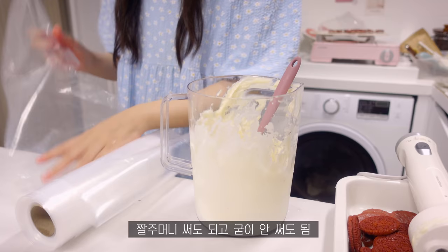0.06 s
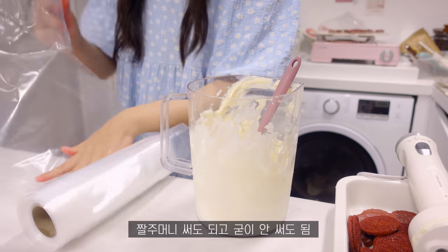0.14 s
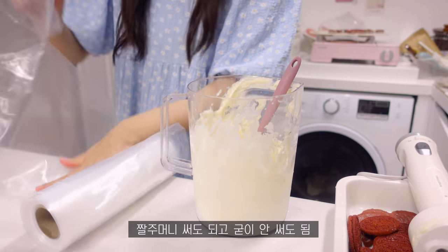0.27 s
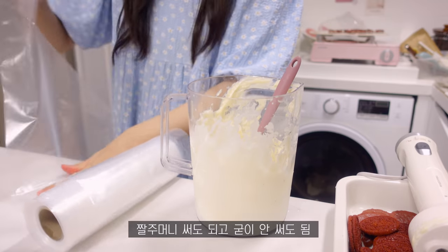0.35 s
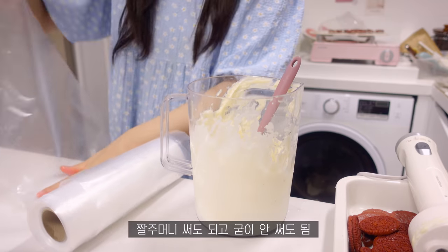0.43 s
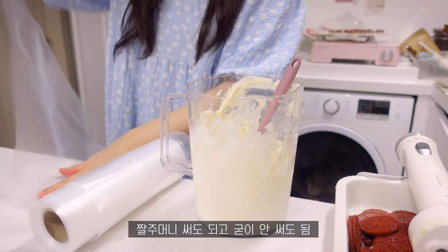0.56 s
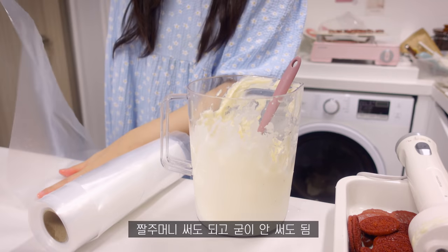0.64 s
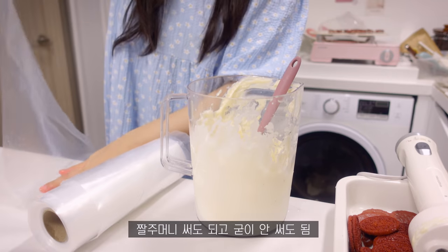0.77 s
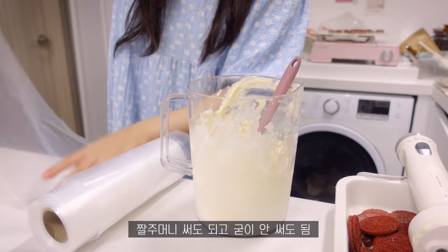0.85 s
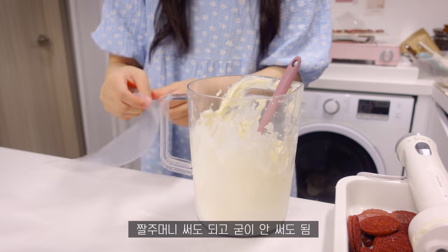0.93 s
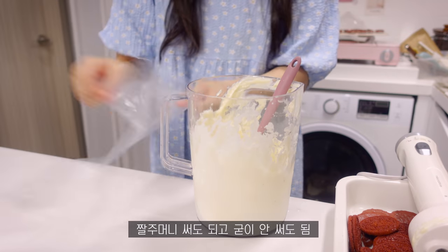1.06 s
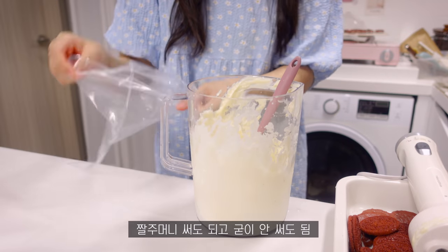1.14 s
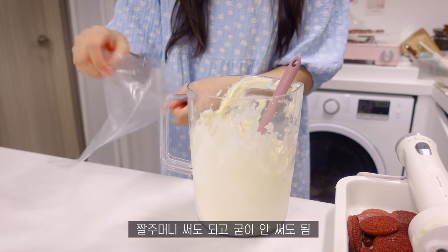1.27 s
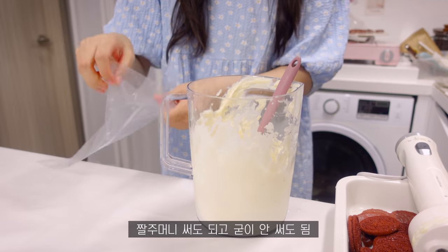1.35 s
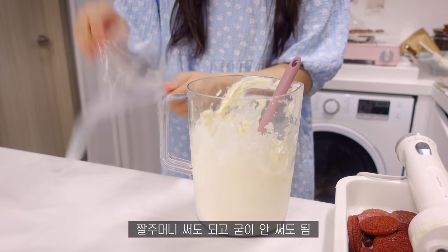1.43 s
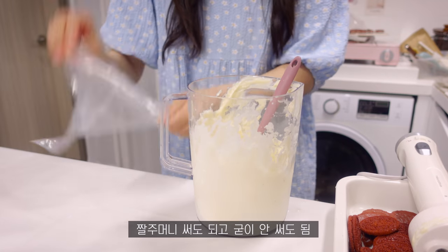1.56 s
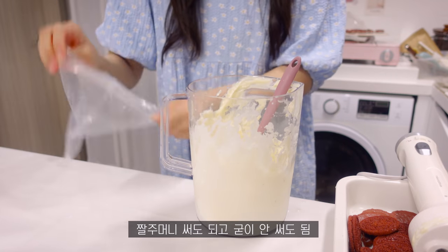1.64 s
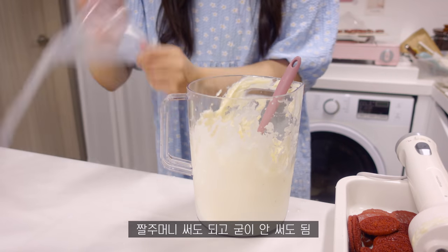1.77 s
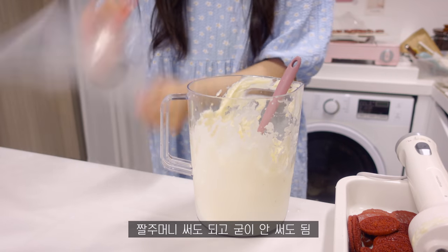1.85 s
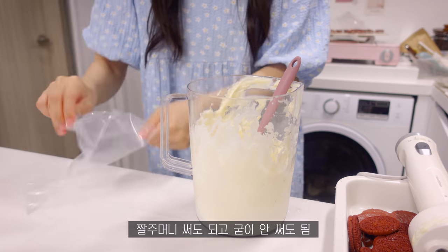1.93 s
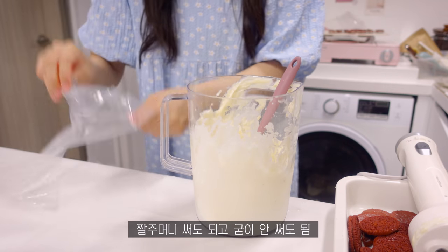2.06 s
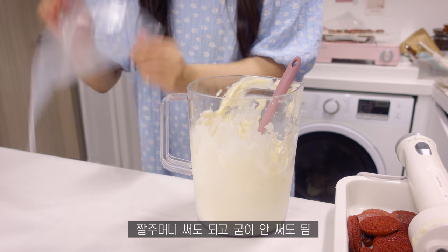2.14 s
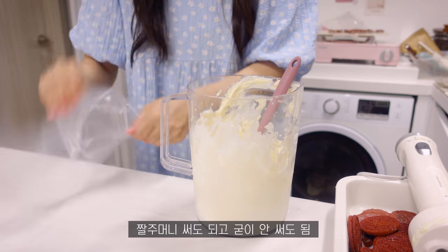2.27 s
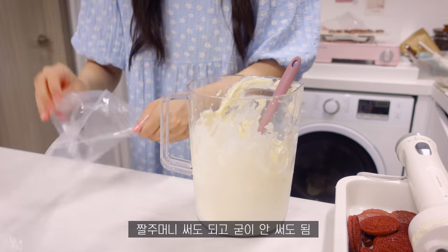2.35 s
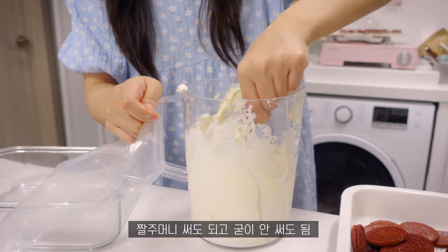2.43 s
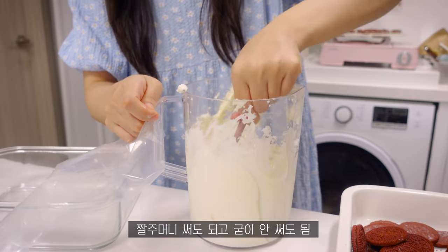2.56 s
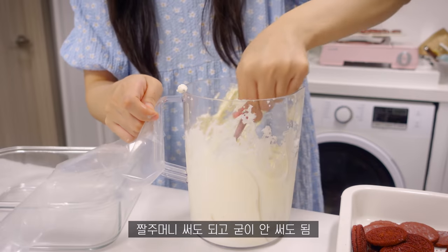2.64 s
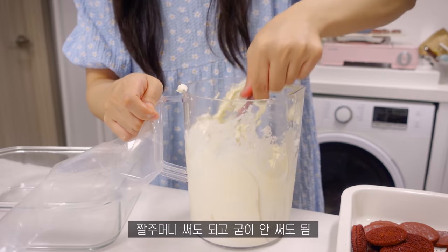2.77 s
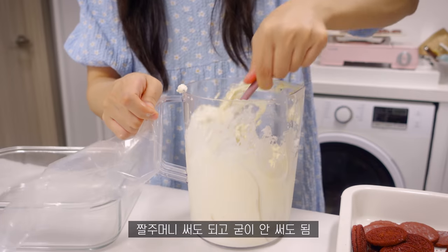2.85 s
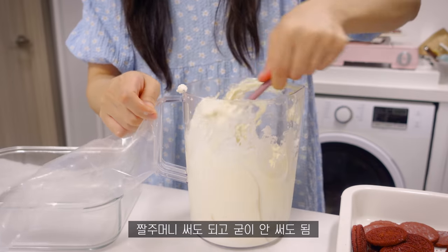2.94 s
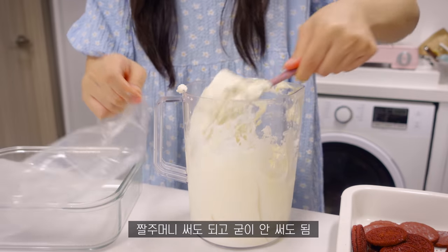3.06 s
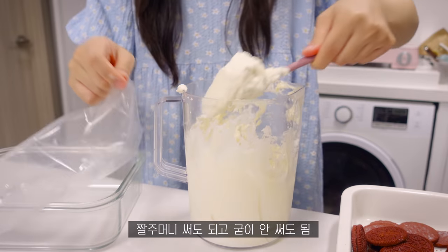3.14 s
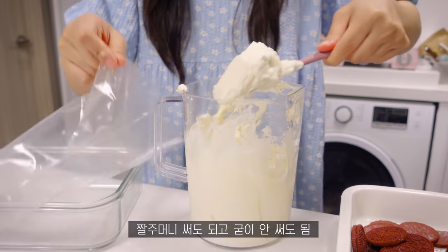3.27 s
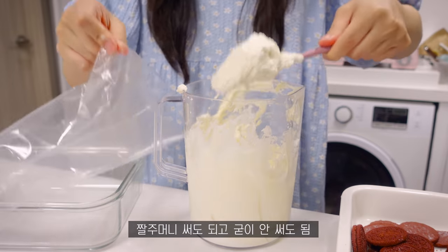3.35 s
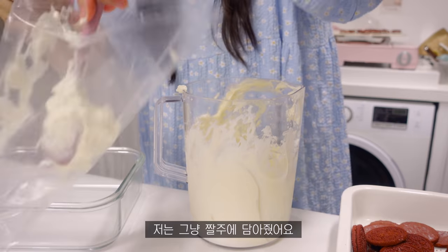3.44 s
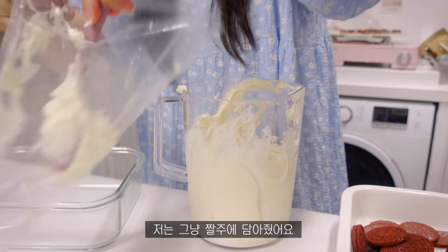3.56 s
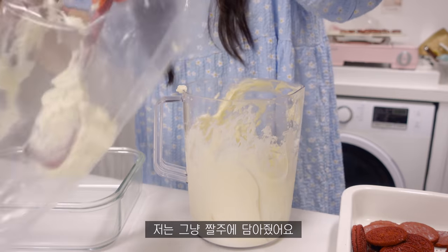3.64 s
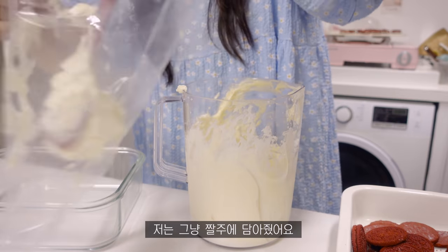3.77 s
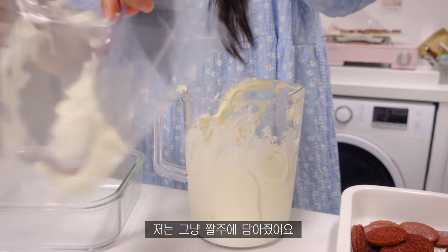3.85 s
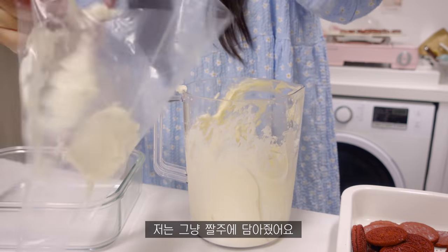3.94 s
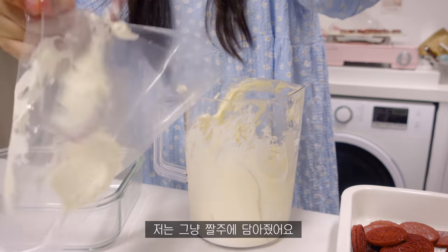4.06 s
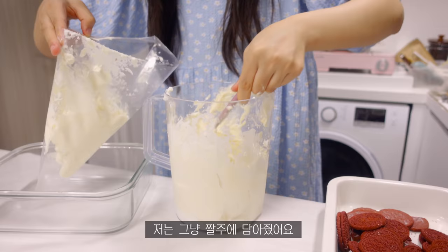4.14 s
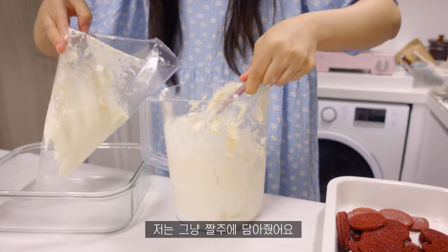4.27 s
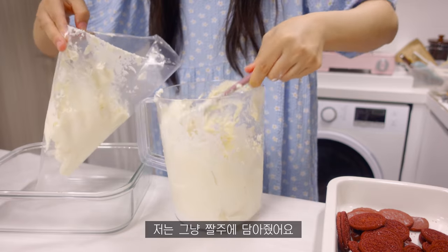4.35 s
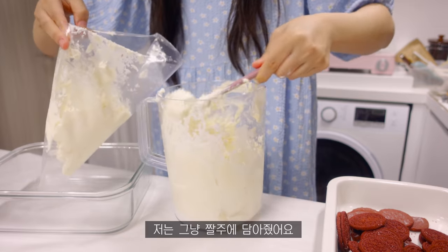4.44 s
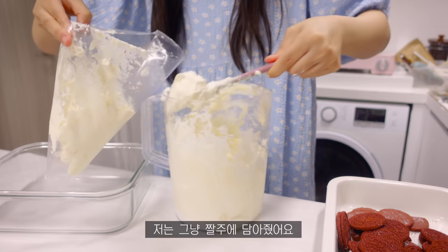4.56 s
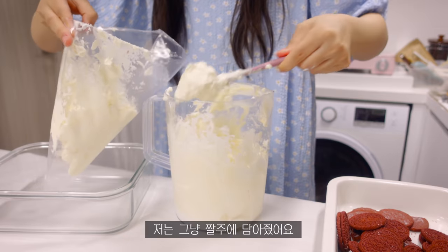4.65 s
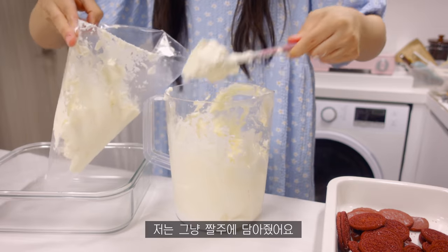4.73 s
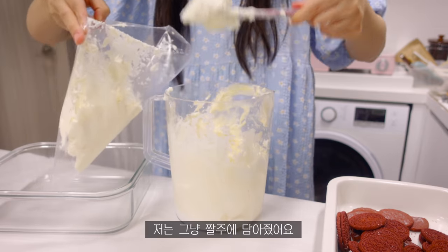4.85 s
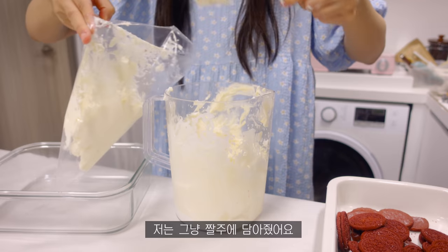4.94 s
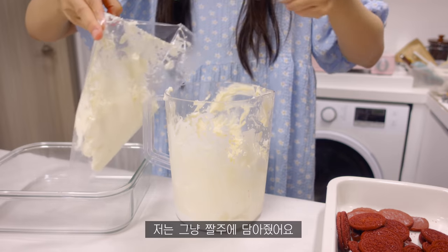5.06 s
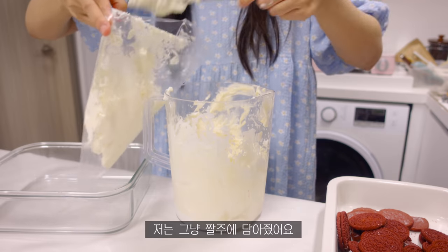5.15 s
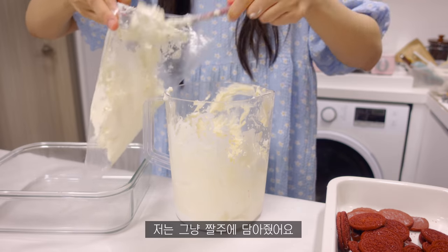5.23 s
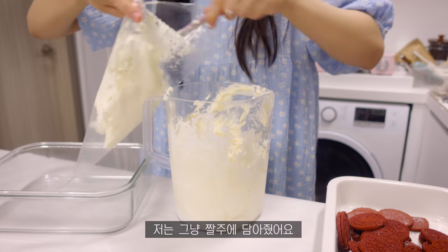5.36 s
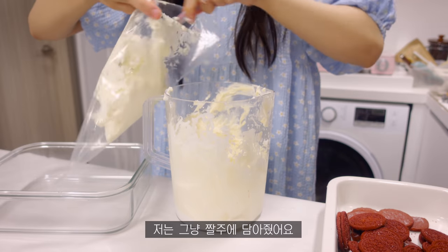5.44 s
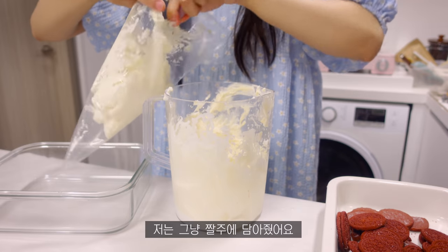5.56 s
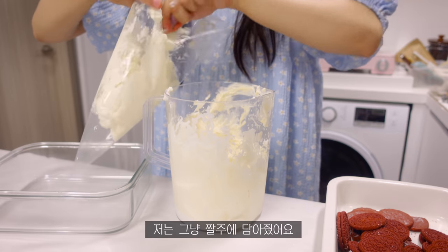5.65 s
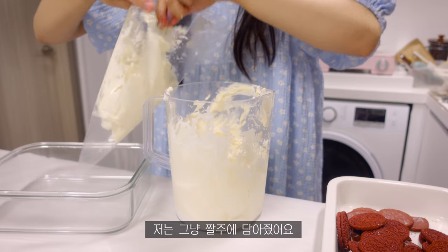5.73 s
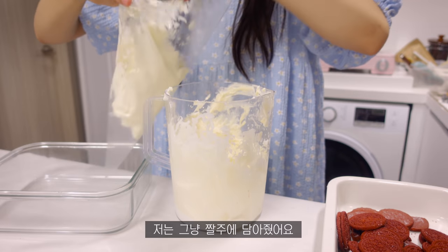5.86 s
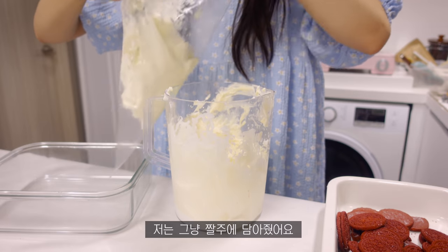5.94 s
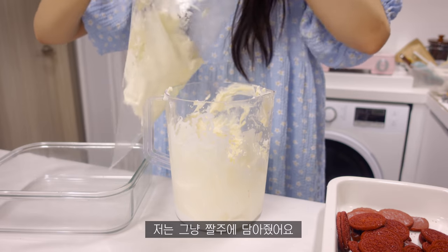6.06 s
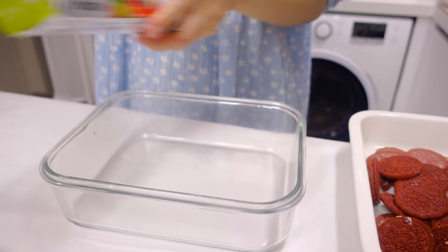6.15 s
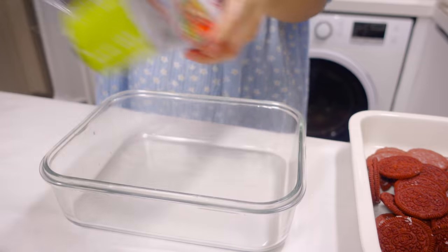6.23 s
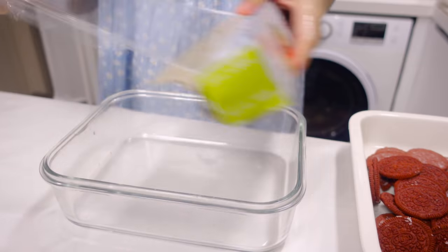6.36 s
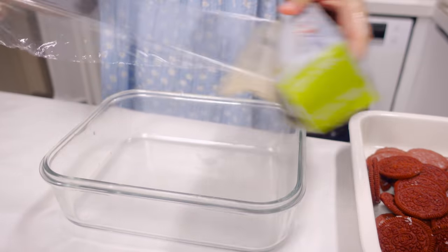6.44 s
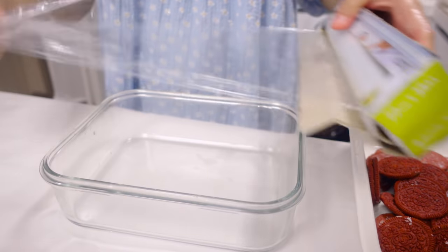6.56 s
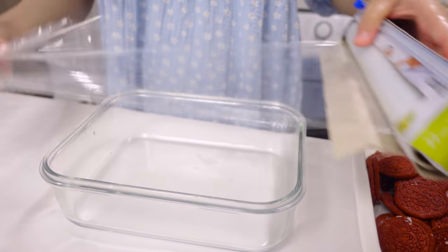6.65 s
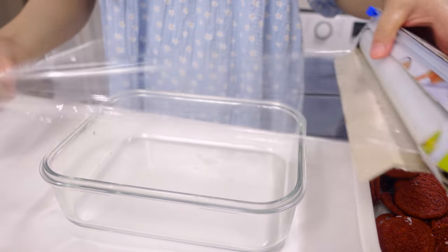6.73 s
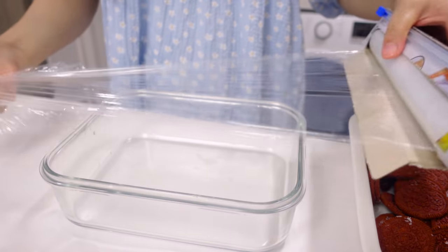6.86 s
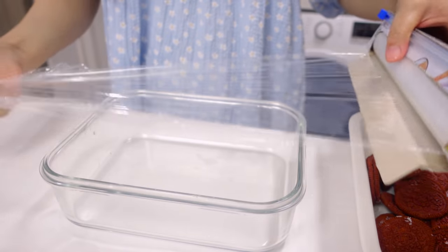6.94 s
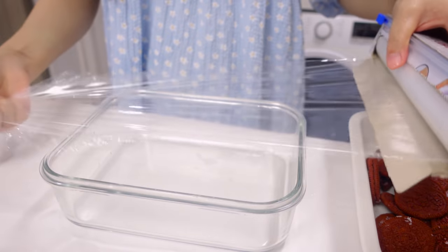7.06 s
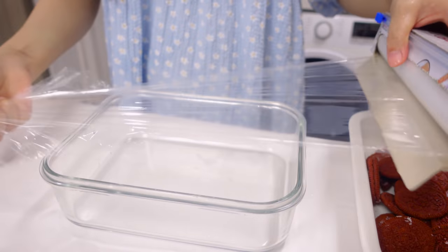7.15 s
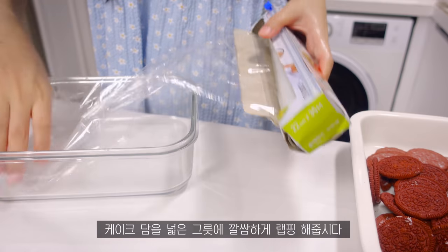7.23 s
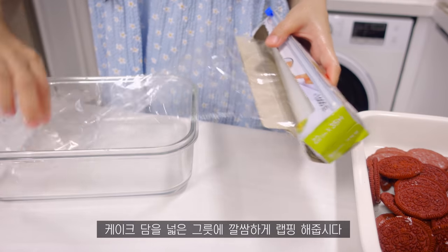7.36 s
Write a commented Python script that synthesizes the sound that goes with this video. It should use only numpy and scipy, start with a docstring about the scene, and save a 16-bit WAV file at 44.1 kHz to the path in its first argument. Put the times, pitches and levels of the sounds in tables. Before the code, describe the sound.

Close up on a kitchen counter, over a low hum of appliances, a plastic piping bag tears from a roll with a quick rip and crackles loudly as it opens. Light spatula knocks against a jug follow, then more crinkling, a brief wet squelch, a dull thud and a couple of soft slaps as cream goes in. At the end cling film is pulled twice from its roll with a ticking, fizzy hiss.

```python
"""A plastic piping bag crinkles and rips from its roll, close to a stereo microphone on a kitchen counter.
The perforation gives way bridge by bridge; the bag is shaken open, its creases buckling with sharp pops,
and a spatula fills it from a jug, with knocks, slaps and a squelch of cream. Last, cling film peels from
its box, fizzing and ticking as it unsticks. Appliances hum low behind the action and its jump cuts."""
import sys
import numpy as np
from scipy import signal
from scipy.fft import rfft, irfft, next_fast_len
from scipy.io import wavfile

SR = 44100
rng = np.random.default_rng(int(sys.argv[2]) if len(sys.argv) > 2 else 0)


def master_out(mix):
    """Clip the mix to full scale and print it as 16-bit PCM to the path in sys.argv[1]."""
    frames = np.transpose(np.atleast_2d(mix))
    ceiling = np.clip(frames, -1, 1)
    pcm = np.round(ceiling * 32767).astype(np.int16)
    wavfile.write(sys.argv[1], SR, pcm)


N = 326340

# spectrum of the crinkling bag: (frequency [Hz], level [dB])
CRINKLE_SPECTRUM = [(88, -41), (150, -5), (296, -8.5), (481, -3.5), (631, -10), (1010, -2), (2660, -5.5),
                    (4240, -6.5), (7300, -19.5), (12100, -19), (15600, -30.5)]
# moves of the hands on the bag; the signs of rise and fall are ignored: (time [s], rise [s per 20 dB],
# hold [s], fall [s per 20 dB], crinkle [dB], bright part [dB re crinkle], pushed air [dB])
HAND_MOVES = [(0.185, 0.09, 0.0226, 0.1, -29, -10.5, -31), (0.634, 0.15, 0.00114, 0.0716, -20, -3, -28),
              (0.707, 4.1, 0.29, 6.5, -46, -7.5, -59), (1.01, 0.55, 0.059, 0.07, -36, -6, -54.5),
              (1.184, 0.1, 0.0136, 0.0452, -10, -2.5, -18), (1.316, 0.08, 0.0076, 0.1064, -32.5, 4.5, -36),
              (1.528, 0.002, 0.02, 0.04, -24, -9, -28), (1.554, 0.006, 0.016, 0.085, -19, -4, -22),
              (1.733, 0.12, 0.002, -0.67, -39.5, -8, -48), (1.766, -0.02, 0.0133, 0.13, -20, -7, -28),
              (1.837, 0.0043, 0.024, 0.1129, -25, 0, -29.5), (1.914, -0.0012, 0.038, 0.1709, -15, -2, -23),
              (2.258, 0.0546, 0.0151, 0.0828, -19.5, -15.5, -20.5),
              (2.384, 0.1314, 0.0108, -0.0639, -23, -3, -25), (2.455, -1, 0.00096, 0.03, -33.5, -2, -45.5),
              (2.475, 2.5, 0.092, -0.5, -53.5, 0.5, -60.5), (3.165, 0.06, 0.1, 0.12, -56, 1, -53),
              (3.35, 0.04, 0.012, 0.04, -40, -13.5, -47.5), (3.464, 1, .001, 0.48, -32.5, -13, -27.5),
              (3.65, 0.1, 0.034, 0.16, -36, -7, -31), (3.853, 0.34, 0.011, -0.52, -31.5, -9, -31),
              (3.907, -0.02, 0.041, -0.17, -27.5, -13.5, -24), (4.054, 0.08, 0.091, 0.4, -31, -20, -28),
              (4.176, 0.2, 0.0226, -0.12, -30.5, -15, -30.5), (4.507, 2, 0.001135, -1.24, -55, -3, -50.5),
              (4.693, 0.063, 0.02, 0.25, -50, -7, -30), (5.224, 0.16, 0.0012, -1, -53.5, -8.5, -55),
              (5.399, 0.01, .001, 0.47, -42, -30, -45.5), (5.464, 0.19, .001, 0.46, -43, -31, -42),
              (5.712, 0.16, 0.0174, 0.5, -51, -5, -41), (5.841, -0.16, .001, 0.39, -42, -3, -50)]
# sharp clicks: creases popping, and the spatula's first contact with the jug; each band adds its own trim
# and stretch: (time [s], level [dB], pitch [Hz], dull part [dB re level], middle part [dB re level],
# bright part [dB re level], decay [ms])
SHARP_CLICKS = [(0.1911, -13, 1515, -10, -18, -20, 1.7), (0.1986, -14, 1650.0, -6.5, -16.5, -22, 2),
                (0.292, -21, 1610.0, -11.5, -5.5, -9, 1.95), (0.3113, -9, 1307, 0.5, 0, -18, 1.6),
                (0.7733, -23.5, 2015, -28, -15, -26.5, 2.35), (0.8822, -22, 1940, -30.5, -20, -23.5, 3.15),
                (1.0149, -20.5, 1972, -14, -4.5, -19, 2.05), (1.04, -22.5, 930, -3.5, -7, -19, 1.95),
                (1.0798, -11, 2100, -24.5, -14, -11, 1.67), (1.0921, -15, 1030.0, -23, 2.5, -14.5, 1.2),
                (1.1484, -1, 2220, -12, 3.5, -2, 1.47), (1.163, 1.5, 4300, -11.5, -1.5, -13, 1.97),
                (1.1773, -1, 1363, -19.5, -9.5, -6, 1.72), (1.1954, 6, 3980, -20.5, 1.5, -5.5, 3.5),
                (1.283, -13.5, 4845, -31, -2, -11.5, 1.05), (1.3038, -12, 3420, -23.5, -4.5, -1.5, 1.6),
                (1.3196, -5.5, 2056, -26, -13.5, 9, 0.88), (1.4399, -23.5, 1150.0, -15, -5.5, -25.5, 2.05),
                (1.4612, -18, 1920, -21.5, -19, -26.5, 1.6), (1.5175, -23.5, 1270, -9.5, -8, -20, 1.8),
                (1.5261, -2, 1062, -12, -2, -21.5, 1.4), (1.5339, -11, 3250, -11, -3, -19.5, 1.77),
                (1.5555, 2, 1080, -12.5, -2.5, -12, 1.85), (1.5636, -1, 1098, -6.5, 0, -20.5, 2.13),
                (1.5767, -10, 3640.0, -10, 0, -17, 2.75), (1.5837, -10, 1086, -17, 5.5, -17, 2.2),
                (1.597, -12.5, 1080, -7.5, 4.5, -16.5, 1.9), (1.6472, -22.5, 818, -19, -1, -17, 1.4),
                (1.6902, -21.5, 5400, -18.5, -5.5, -10, 1.56), (1.703, -15.5, 2085, -11, -6, -16, 1.97),
                (1.7626, -15, 1530.0, -26, 4, -14.5, 2.5), (1.7718, -3, 1264, -11, -4, -21.5, 2.82),
                (1.7986, -11, 4920.0, -16, -8.5, -9.5, 1.7), (1.8294, -3.5, 4120, -18, -3, -1, 1.77),
                (1.8354, -9.5, 2730.0, -23.5, -2, -2, 2), (1.8522, -7.5, 1257, -20, 0.5, -9, 1.7),
                (1.8588, -8.5, 3350, -28.5, -5, -17.5, 2.13), (1.9164, -3, 1450, -22.5, -9.5, -20, 1.4),
                (1.9243, -3.5, 988, -12.5, 1, -18, 1.8), (1.9469, 2.5, 5420, -17, 4, -6.5, 2.4),
                (2.01, 0, 1824, -14, -3.5, -14, 2.35), (2.038, -5.5, 1967, -19.5, -16, -23.5, 2.2),
                (2.119, -11.5, 3180, -25.5, -6.5, -15.5, 1.6), (2.1294, -19.5, 1308, -23.5, -3, -22.5, 2.5),
                (2.1868, -7, 2326, -19, 2, -10.5, 1.66), (2.2125, -14.5, 1055, -9.5, -8, -21, 2.13),
                (2.252, -7.5, 2160, -5, 2, -8, 2.05), (2.2585, -7, 1086, -10, -1, -17.5, 2.96),
                (2.2994, -10, 1850, -29.5, -14, -19, 1.84), (2.3168, -4.5, 4330, -12.5, -6, -13.5, 2.53),
                (2.3496, -3.5, 5060, -33, -3, -6, 1.84), (2.3702, 1, 4130, -12.5, 1, -6.5, 1.31),
                (2.3805, -2.5, 4640, -16, -0.5, -4, 3.2), (2.4914, -19.5, 2490, -12.5, -1.5, -15, 1.52),
                (2.5418, -23.5, 1003, -14.5, -3.5, -12, 1.66), (2.6221, -21, 800, 0, -12.5, -7.5, 1.06),
                (2.7655, -29, 1034, -3, -12, -7.5, 2.1), (2.8211, -25.5, 824, -7, -19, -7, 1.15),
                (2.927, -34, 1915, -14, -3, -18, 1.67), (2.9822, -33, 1942, -9.5, -15, 3, 2.07),
                (3.0666, -33.5, 1930.0, -17.5, -9, 1, 0.95), (3.3312, -24.5, 1520.0, -17.5, -8, -17, 2.17),
                (3.3425, -10.5, 4050, -19.5, -7, -3.5, 1.63), (3.4643, -9.5, 910, -9, -2, -17, 2.1),
                (3.469, -8, 1938, -13, -19, -16.5, 1.78), (3.4776, -10.5, 1042, -27, -2, -20.5, 1.62),
                (3.51, -12, 4150.0, -14.5, -3.5, -6.5, 1.6),
                (3.5193, -13, 1200.0, -13.5, -2.5, -19.5, 1.74), (3.5239, -7, 2455, -8.5, -3.5, -15, 1.2),
                (3.5325, -12, 1390.0, -19.5, -3.5, -16, 2.75),
                (3.5488, -11.5, 1100, -10.5, 0.5, -13.5, 1.72), (3.593, -10.5, 2590.0, -13, -9, -2, 2.04),
                (3.5979, -8.5, 1282, -14.5, -3, -19, 1.56), (3.6079, -16, 1040.0, -6, -1.5, -17.5, 1.4),
                (3.6312, -19.5, 2550.0, -14, -9, -18.5, 1.8), (3.669, -10.5, 4980, -20, -5, -6.5, 1.53),
                (3.681, -13.5, 1195, -13, -9, -20.5, 2.03), (3.6893, -8.5, 1985, -20.5, -6, -24, 1.8),
                (3.7161, -17, 1727, -19, -6.5, -8, 1.67), (3.7354, -15, 2580, -18.5, -7, -17.5, 1.78),
                (3.7437, -15.5, 1280.0, -6, -4.5, -18, 1.9), (3.757, -15, 1410, -2, -11.5, -19.5, 2.2),
                (3.7643, -15.5, 1980, -6.5, -5, -15, 1.92), (3.798, -12, 2000, -18, -4.5, -13, 2.17),
                (3.8256, -21, 2410.0, -11, -2.5, -15, 1.85), (3.8358, -16, 1866, -12.5, -14, -21, 2.23),
                (3.857, -5.5, 4080, -10.5, -1, 0.5, 2.15), (3.898, -15.5, 2100.0, -15.5, -10, -17, 1.7),
                (3.909, -6, 2620, -8.5, -11, -17.5, 2.26), (3.9142, -5, 995, -12.5, -7, -24.5, 1.54),
                (3.9191, -6.5, 2160, -13, -12.5, -22.5, 3), (3.9428, -11, 2570, -17, -5.5, -13, 1.7),
                (3.9581, -17.5, 1050, -19.5, -7.5, -13, 1.8), (3.9721, -16.5, 2060.0, -14, -8.5, -18, 1.77),
                (3.9784, -16, 1980.0, -18, -3, -21, 2), (3.9858, -16.5, 1160.0, -8.5, -5.5, -18, 1.53),
                (4.013, -8.5, 3730, -9.5, -5.5, -9, 1.41), (4.0443, -8, 2160, -6, -6, -17, 2.83),
                (4.0568, -10, 1870, -18, -6, -22, 1.77), (4.0978, -11, 955, -6.5, -3, -19.5, 2.68),
                (4.128, -12.5, 3420, -9, -19.5, -19, 3.23), (4.137, -14.5, 1398, -12.5, -8, -21.5, 1.9),
                (4.1614, -20.5, 2520, -18, -8.5, -15, 1.93), (4.208, -24, 1008, -15.5, 0.5, -23.5, 1.32),
                (4.3707, -29, 3640, -27.5, -0.5, -10, 1.42), (4.4383, -34, 5153, -26, -17, 1.5, 1.15),
                (4.5139, -29.5, 819.3, -6.5, -12, -14, 2.67), (4.7164, -23.5, 855, -6.5, -14, -31, 1.28),
                (4.8392, -37, 1868, -1.5, -13.5, -20.5, 1.61), (5.334, -25, 868, -12.5, -20, -32.5, 2.2),
                (5.366, -24.5, 1028, -4.5, -17.5, -28.5, 2.46),
                (5.3773, -24.5, 816, -3.5, -10.5, -30.5, 2.14), (5.382, -7.5, 3820, -9.5, -1.5, -25.5, 1.7),
                (5.4664, -19, 1116, -13.5, -1, -19.5, 1.42), (5.4711, -18.5, 1095, -11.5, -14.5, -28, 1.73),
                (5.4955, -12, 2136, -19.5, -14, -29, 1.8), (5.5058, -16, 1083, -24, -6, -31, 1.38),
                (5.5614, -31.5, 1110.0, -16, -12, -24, 1.9),
                (5.5831, -23.5, 1715, -15.5, -3.5, -23.5, 1.56),
                (5.5851, -12.5, 1990, -19.5, -7, -25.5, 1.57), (5.6837, -31.5, 1170.0, -3.5, -13, -21, 2),
                (5.702, -26, 2194, -8, -11, -14, 1.9), (5.7319, -28, 1770, -6, -9, -21, 1.54),
                (5.783, -30, 1020.0, -20, -8.5, -12, 1.97), (5.8321, -22, 1040.0, -10, -15, -25.5, 1.64),
                (5.8367, -18.5, 1070.0, -17, -16, -27.5, 1.22),
                (5.843, -11.5, 1020, -13.5, -1.5, -23, 1.09),
                (5.8517, -20.5, 1075, -16, -16.5, -22.5, 1.67), (5.8769, -26.5, 819.2, -18, 1.5, -14, 1.55),
                (5.8999, -28.5, 1000.0, -13, -16.5, -14.5, 1.7),
                (5.925, -19.5, 1605, -29, -20, -27.5, 1.42), (5.9523, -28, 1030.0, -14.5, -8, -7.5, 1.8),
                (5.9645, -7.5, 1315, -18.5, -3.5, -15.5, 1.14), (6.0045, -9.5, 5190, -25, -4, -9, 1.57),
                (6.1378, -32, 952, -11.5, -5.5, -18.5, 1.53)]
# pull on the perforation: (time [s], force [dB], push of the sheet [dB], crack [dB re force])
RIP_PULL = [(.311, -33.5, -28, 2.5), (.33, -21, -13.5, 4), (.35, -21, -19, 0.5), (.375, -22, -23.5, 4.5),
            (.395, -25.5, -29, 5.5), (.41, -23, -23, -0.5), (.45, -18.5, -19.5, 5.5),
            (.48, -19.5, -21.5, -4.5), (.51, -21, -16, 10), (.535, -21.5, -10.5, 6),
            (.575, -15.5, -10.5, -2), (.628, -16.5, -23, -8.5), (.636, -37.5, -40, -4.5)]
# how far the tear has run: (time [s], bridges torn [count])
BRIDGES_TORN = [(.3115, 0), (.324, 1), (.33, 2), (.3505, 5), (.3812, 9), (.3993, 11), (.4253, 13),
                (.4462, 15), (.4825, 19), (.5093, 22), (.5193, 23), (.583, 31), (.639, 39)]
# fixed resonances of the pulled sheet: (frequency [Hz], width [Hz], gain [dB])
SHEET_MODES = [(372, 143, 6), (756, 890, 0), (1222, 280, -2), (2000, 1360, -5), (2660, 3000, -16.5)]
# the sheet's main ring moves with its tension: (time [s], frequency [Hz])
TAUT_RING = [(.311, 1494), (.46, 1464), (.53, 1930), (.575, 1800), (.6, 1390), (.64, 1390)]
# the spatula knocks the jug: (time [s], level [dB])
JUG_KNOCKS = [(2.508, -28), (2.542, -33), (2.6223, -23.5), (2.7654, -34), (2.806, -41.5), (2.821, -41.5),
              (4.715, -41.5), (5.842, -29)]
# modes of the jug: (frequency [Hz], gain [dB], t60 [s])
JUG_MODES = [(505, -10, 0.08), (760, 4, 0.02), (960, -2, 0.02), (1020, -1, 0.045), (1110, -3, 0.03),
             (1750, -6, 0.0134), (3820, -22, 0.12)]
# roll, bag and jug jerk or land: (time [s], level [dB], frequency [Hz], t60 [s])
THUDS = [(0.3113, -7.5, 237.6, 0.0373), (.331, -3.5, 148.4, 0.0814), (.4, -17, 50, 0.133),
         (1.553, -3, 32, 0.122), (1.556, -11, 236, 0.052), (4.669, -22.5, 441.4, 0.0437),
         (4.671, -12, 98.5, 0.102), (4.688, -21, 58.2, 0.068), (4.705, -21, 60.3, 0.0288),
         (4.743, -22.5, 59.2, 0.074)]
# the spatula slaps the filled bag: (time [s], level [dB], ring [Hz])
SPATULA_SLAPS = [(5.383, -31.5, 1884), (5.586, -36, 2000)]
# an air pocket opens in the cream: (time [s], frequency [Hz], level [dB])
AIR_POCKET = [(4.498, 1592, -51), (4.506, 1497, -41), (4.515, 890, -42.5), (4.522, 467, -35.5),
              (4.545, 475, -55.5)]
# cling film leaves the roll, one list for each of two pulls: (time [s], strength [dB])
FILM_PULLS = [
    [(6.176, -31.5), (6.32, -33), (6.43, -26), (6.538, -28), (6.586, -33), (6.69, -34), (7.016, -51.5),
     (7.1, -75.5)],
    [(7.1, -60.5), (7.21, -69), (7.278, -37.5), (7.4, -43)],
]
# spectrum of the film's fizz: (frequency [Hz], level [dB])
FILM_SPECTRUM = [(1200, -24), (2300, -17.5), (3000, -10.5), (3500, -2.5), (3950, 2.5), (4500, -2.5),
                 (5000, -3.5), (5450, -0.5), (5900, -8), (9000, -6.5), (15600, -9.5), (18000, -40.5)]
# balance as the film gets longer: (time [s], bright fizz [dB re pull], box rumble [dB re pull])
FILM_BALANCE = [(6.176, -7, -2), (6.53, 0.16, -2), (6.75, -0.07, -4.5), (7.4, 5.5, -26.5)]
# ring of the stretched film: (time [s], frequency [Hz], gain [dB])
FILM_RING = [(6.176, 1670, 10.5), (6.42, 1713, 11), (6.6, 1628, 4), (7.0, 1554, 10.5), (7.15, 1794, -0.5),
             (7.4, 1840, 8.5)]
# resonances of roll and box: (frequency [Hz], width [Hz], gain [dB])
ROLL_MODES = [(397, 78, -5.5), (794, 1500, 7), (1160, 136, 14.5)]
# single spots of film unstick: (time [s], level [dB])
FILM_TICKS = [(6.335, -20.5), (6.436, -17.5), (6.475, -15), (6.534, -12.5), (6.6061, -14), (6.665, -16),
              (6.7471, -14), (6.7883, -13.5), (6.808, -11.5), (6.8307, -19.5), (6.852, -27), (6.859, -21.5),
              (6.8806, -22.5), (6.901, -27), (6.922, -22), (6.9384, -19), (6.9661, -20), (7.02, -32.5),
              (7.0278, -37), (7.0482, -29.5), (7.13, -29.5), (7.149, -31), (7.2236, -33), (7.2434, -21),
              (7.2566, -17), (7.2849, -13), (7.3816, -13.5)]
# spectrum of the kitchen's hum and hiss: (frequency [Hz], level [dB])
ROOM_SPECTRUM = [(15, -38), (25, -7), (43, -4), (174, -9.5), (193, -21), (221, -8.5), (306, -19),
                 (340, -15.5), (615, -19), (704, -27.5), (15600, -39)]
# the room tone fades in: (time [s], gain [dB])
ROOM_FADE = [(0, -17.5), (.1, -8.5), (.128, -5), (.135, 3.5), (7.4, 2)]
# where the hands are: the sound shifts left or right; hard cuts at 0.13, 3.46, 4.22 and 6.18 s:
# (start [s], lead at the left port [us], left minus right [dB])
HAND_POSITIONS = [(0, 27, 3.5), (0.129, 31.6, 3.5), (1.0, 32.1, 1), (2.45, 5.9, 0.8), (3.4621, 2.5, 2),
                  (4.217, 10.6, 1.5), (5.3, 31, 2), (6.175, 6.1, -1.5), (7.15, 7.8, -0.56)]


def handling():
    """The bag in the hands, close up: it crackles in four bands, and the flapping sheet pushes air."""
    crinkle_db, bright_db, air_db = hand_levels()
    low, high = (colour(grains(320, 3.1, .002, bed=.35), CRINKLE_SPECTRUM) for _ in range(2))
    middle = amp(crinkle_db - 1.5) * evened(band(low, 810.4, 2500))
    upper = amp(0.5775 * crinkle_db + 0.3796 * bright_db - 6) * evened(band(high, 2500, 4876))
    bright = amp(bright_db) * evened(band(high, 5660, 18000))
    widened = low + np.outer([.3, -.3], high[0])
    dull = amp(0.7184 * crinkle_db - 18.5) * evened(band(widened, 62, 770))
    gust, eddy = rng.standard_normal((2, N))
    gusts = gust + np.outer([.25, -.25], eddy)
    air = amp(air_db) * evened(band(gusts, 14, 54) + 0.22 * band(gusts, 55, 150))
    after_first_cut = np.arange(N) > HAND_POSITIONS[1][0] * SR
    return (amp(-4) * (middle + upper + bright) + dull + air) * after_first_cut


def hand_levels():
    """Crinkle, bright and air levels [dB]: each move swells, holds and dies within one hand position."""
    rest_db, rustle_db, rustle_fall_s = -70, -21, 0.034
    t = np.arange(0, N + 32, 32) / SR
    starts = [row[0] for row in HAND_POSITIONS]
    power = amp(rest_db) ** 2 * np.ones((3, len(t)))
    # a short rustle follows every sharp click
    rustles = [(s, .001, 0, rustle_fall_s, db + rustle_db, .5 * bright_db, -120)
               for s, db, *_, bright_db, _ in SHARP_CLICKS]
    for s, rise_s, hold_s, fall_s, db, bright_db, air_db in HAND_MOVES + rustles:
        rise_db = -20 * np.maximum(s - t, 0) / abs(rise_s)
        fall_db = -20 * np.maximum(t - s - hold_s, 0) / abs(fall_s)
        same_position = np.searchsorted(starts, t) == np.searchsorted(starts, s)
        power += same_position * (amp(rise_db + fall_db) * amp([[db], [db + bright_db], [air_db]])) ** 2
    return [np.interp(np.arange(N) / SR, t, 10 * np.log10(p)) for p in power]


def sharp_clicks():
    """Creases pop and the spatula first meets the jug; the bass of each click outlasts its treble."""
    s, db, hz, dull_db, middle_db, bright_db, decay_ms = np.transpose(SHARP_CLICKS)
    decay_s = decay_ms / 1000
    layers = [(db + dull_db - 0.5, 200, 900, 2.315 * decay_s),
              (db - 4, hz / 1.398, hz * 1.327, 1.323 * decay_s),
              (db + middle_db - 0.5, 2000, 6500, 0.8 * decay_s),
              (db + bright_db + 0.6, 5600, 11500, 0.9 * decay_s)]
    return pops(s, layers, pan_db=2.1 * rng.standard_normal(len(s)), spike=3.226)


def perforation_rip():
    """Each bridge lets go with a one-sided push of the sheet and a crack; the sheet rings on."""
    t = np.arange(SR) / SR
    force_db, push_db, crack_db = follow([RIP_PULL])[:, :SR]
    torn = np.interp(t, *np.transpose(BRIDGES_TORN))
    bridge_db = 1.5 * rng.standard_normal(100)[torn.astype(int)]  # bridges differ in strength
    pulses = np.exp(2.436 * np.cos(2 * np.pi * (torn - 0.03)))
    push = 0.1855 * amp(push_db) * band(pulses, 41, 1040) * np.array([[1.1], [0.9]])
    release = np.exp(-(torn % 1) / 0.0726)
    noise = port_noise(SR)
    shaking = (release + 0.699) * noise
    taut = amp(4.5) * glide(shaking, np.interp(t, *np.transpose(TAUT_RING)), width_hz=241)
    sheet = 2.828 * (ring(shaking, SHEET_MODES) + taut)
    crack_body = band((release + 0.028) * noise, 2600, 7950)
    crack_edge = band((release + 0.1) * noise, 5300, 13000)
    crack = 3.33 * amp(crack_db + bridge_db) * (crack_body + 0.38 * crack_edge)
    return np.pad(push + amp(force_db) * (sheet + crack), ((0, 0), (0, N - SR)))


def film_peel():
    """Countless tiny slips of the cling film fizz and shake the roll, which drones; the box rumbles."""
    pull_db, = follow(FILM_PULLS)
    bright_db, rumble_db = follow([FILM_BALANCE])
    ring_hz, ring_db = follow([FILM_RING])
    slips = grains(1400, 3, 0.0012, bed=0.87)
    film = colour(slips, FILM_SPECTRUM)
    fizz = evened(band(film, 1700, 6500)) + amp(bright_db) * evened(band(film, 6600, 14060))
    ringing = ring(slips, ROLL_MODES) + amp(ring_db + 3.5) * glide(slips, ring_hz, width_hz=221)
    drone = amp(0.8258 * pull_db - 5) * (pull_db > -100) * evened(band(ringing, 245.5, 2314))
    rumble = evened(band(rng.standard_normal(N), 20, 90) + 0.2 * band(rng.standard_normal(N), 95, 517))
    peeling = amp(pull_db) * (fizz + amp(rumble_db) * rumble) + drone
    pan_db = np.interp(np.arange(N) / SR, [6.3, 6.75, 7.2], [.3, -2.5, .6])
    return panned(peeling, pan_db)


def film_ticks():
    """Single spots of film unstick with bright ticks, a little left of the microphone."""
    s, db = np.transpose(FILM_TICKS)
    layers = [(db - 6.5, 1500, 7000, .0012), (db, 9000, 16500, .0008)]
    return pops(s, layers, pan_db=np.full(len(s), 3), spike=1.82)


def thuds():
    """Roll, bag and jug jerk or land, each time with one low damped swing."""
    out, t = np.zeros(N), np.arange(9000) / SR
    for s, db, hz, t60 in THUDS:
        out[round(s * SR):][:len(t)] += amp(db - 60 * t / t60) * np.sin(2 * np.pi * hz * t)
    return out


def jug_knocks():
    """The spatula strikes the jug, whose modes ring slightly detuned at each knock."""
    out, t = np.zeros(N), np.arange(9000) / SR
    for s, knock_db in JUG_KNOCKS:
        for hz, mode_db, t60 in JUG_MODES:
            mode = np.sin(2 * np.pi * hz * rng.uniform(1, 1.03) * t)
            out[round(s * SR):][:len(t)] += amp(knock_db + mode_db - 4 - 60 * t / t60) * mode
    return out


def spatula_slaps():
    """After a slap the filled bag rings for a moment: dying noise in one resonance."""
    out, t = np.zeros((2, N)), np.arange(9000) / SR
    t60 = 0.152
    for s, db, hz in SPATULA_SLAPS:
        ringing = evened(glide(port_noise(len(t)), np.full(len(t), hz), width_hz=200))
        out[:, round(s * SR):][:, :len(t)] += amp(db - 60 * t / t60) * ringing
    return out


def cream_squelch():
    """Wet sputter rings an air pocket, lower as it widens; while it is small, bare sputter is heard too."""
    hz, db = follow([AIR_POCKET])
    sputter = rng.standard_normal(N)
    smallness = np.clip(hz / 1200, 0, 1)
    tone = 0.86 * np.sin(2 * np.pi * np.cumsum(hz) / SR) * np.clip(900 / np.abs(hz), 0, 1) ** 2
    ringing = 3.54 * glide(sputter, hz, width_hz=297) * smallness
    bare = 1.14 * band(sputter, 1270, 4170) * smallness ** 2
    return amp(db) * (tone + ringing + bare)


def reflections(x):
    """Counter and cupboards reflect briefly, nearly alike at both ports below the treble."""
    t = np.arange(SR // 2) / SR
    taps = rng.choice([-1., 1.], (2, len(t))) * (rng.random((2, len(t))) < .06) * (t > .003)
    alike = taps.sum(0) + np.outer([.35, -.35], taps[0] - taps[1])
    bass = .5 * band(alike, 140, 740) * amp(-60 * t / 0.18)
    middle = 0.671 * band(alike, 800, 2860) * amp(-60 * t / 0.273)
    treble = 0.68 * band(taps, 2000, 15000) * amp(-60 * t / 0.24)
    tail = bass + middle + treble
    return signal.fftconvolve(x.mean(0)[None], tail / np.linalg.norm(tail[0]), axes=1)[:, :x.shape[1]]


def room_tone():
    """Appliances hum low in the background, partly alike on both sides, under a diffuse hiss."""
    left, right = evened(colour(rng.standard_normal((2, N)), ROOM_SPECTRUM))
    shared_hum = 0.34 * band(left + right, 28, 570)
    fade_db, = follow([ROOM_FADE])
    return amp(fade_db - 51.5) * np.array([left + shared_hum, right + shared_hum])


def at_microphone(x, lead_us, pan_db):
    """At close range the direct sound reaches the left port first, over faint reflections."""
    size = next_fast_len(x.shape[1] + 64)
    half_phase = np.pi * np.fft.rfftfreq(size, 1 / SR) * lead_us * 1e-6
    direct = irfft(rfft(x, size) * np.exp(1j * np.outer([1, -1], half_phase)), size)[:, :x.shape[1]]
    return panned(direct + amp(-15) * reflections(x), pan_db)


def port_noise(*shape):
    """Noise at the microphone's two ports, which in the treble hear different parts of a wide sheet."""
    mid, spread = rng.standard_normal((2, *shape))
    side = 0.153 * spread + 0.37 * signal.lfilter(*signal.butter(1, 6290, "high", fs=SR), spread)
    return np.array([mid + side, mid - side])


def grains(per_s, spread_db, burst_s, bed):
    """Random clicks of very unequal size, each a short burst of noise, over an even bed."""
    sizes = amp(spread_db * np.minimum(rng.exponential(1, N), 4))
    clicks = sizes * (rng.random(N) < per_s / SR)
    fade = np.exp(-np.arange(800) / SR / burst_s)
    power = np.abs(signal.oaconvolve(clicks ** 2, fade ** 2)[:N])
    return (evened(np.sqrt(power)) + bed) * port_noise(N)


def pops(times, layers, pan_db, spike):
    """A sharp spike, then a short random ring, in layers of (peak [dB], low [Hz], high [Hz], decay [s])."""
    t = np.arange(1200) / SR
    out = np.zeros((2, N + len(t)))
    noise = port_noise(len(times), len(t))
    noise[:, :, 0] = spike * np.sign(noise[:1, :, 1])
    for layer in layers:
        for k, (peak_db, lo_hz, hi_hz, decay_s) in enumerate(np.broadcast(*layer)):
            pop = band(noise[:, k] * np.exp(-t / decay_s), lo_hz, hi_hz, order=2)
            pop *= amp(peak_db) / np.abs(pop.mean(0)).max()
            out[:, round(times[k] * SR):][:, :len(t)] += panned(pop, pan_db[k])
    return out[:, :N]


def ring(x, modes):
    """Sum of fixed resonances."""
    return sum(amp(db) * signal.lfilter(*signal.iirpeak(hz, hz / width, SR), x)
               for hz, width, db in modes)


def glide(x, hz, width_hz):
    """A resonance that follows the curve hz."""
    turn = np.exp(2j * np.pi * np.cumsum(hz) / SR)
    pole = np.exp(-np.pi * width_hz / SR)
    return 2 * (turn * signal.lfilter([1 - pole], [1, -pole], x / turn)).real


def colour(x, spectrum):
    """Causal filter from points of (frequency [Hz], level [dB])."""
    hz, db = np.transpose(spectrum)
    bins_hz = np.fft.rfftfreq(4096, 1 / SR)
    log_gain = np.log(amp(np.interp(np.log(bins_hz + 1), np.log(hz + 1), db)))
    mirrored = np.r_[log_gain, log_gain[-2:0:-1]]
    taps = np.fft.ifft(np.exp(np.conj(signal.hilbert(mirrored)))).real[:2048]
    return signal.oaconvolve(x, taps[None], axes=1)[:, :N]


def follow(tables):
    """Columns of timed tables as curves over the whole scene; -120 outside them."""
    t = np.arange(N) / SR
    curves = np.full((len(tables[0][0]) - 1, N), -120.)
    for rows in tables:
        s, *columns = np.transpose(rows)
        inside = (t >= s[0]) & (t <= s[-1] + .004)
        curves[:, inside] = [np.interp(t[inside], s, column) for column in columns]
    return curves


def band(x, lo_hz, hi_hz, order=3):
    return signal.sosfilt(signal.butter(order, [lo_hz, hi_hz], "band", fs=SR, output="sos"), x)


def panned(x, left_minus_right_db):
    return x * amp(np.outer([.5, -.5], left_minus_right_db))


def evened(x):
    """Scaled to unit RMS."""
    return x / np.sqrt(np.mean(x ** 2) + 1e-20)


def amp(db):
    return 10 ** (np.asarray(db) / 20)


def scene():
    """The work on the counter shifts left or right with the hands, over one room tone."""
    bag = handling() + sharp_clicks() + perforation_rip()
    filling = jug_knocks() + spatula_slaps() + cream_squelch()
    counter = bag + filling + thuds() + film_peel() + film_ticks()
    pieces = np.split(counter, [round(row[0] * SR) for row in HAND_POSITIONS[1:]], axis=1)
    placed = [at_microphone(x, lead_us, pan_db) for x, (_, lead_us, pan_db) in zip(pieces, HAND_POSITIONS)]
    return np.hstack(placed) + room_tone()


def record(dry):
    """The loudest pops overload the input; a steep low-pass then takes off the top treble."""
    edge_hz = 15750
    low_pass = signal.firwin(511, edge_hz, window=("kaiser", 9), fs=SR)
    return signal.oaconvolve(np.clip(dry, -.97, .97), low_pass[None], "same")


dry = scene()
out = record(dry)
master_out(out)
```